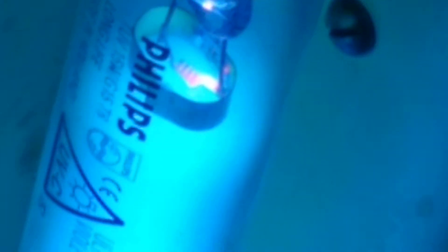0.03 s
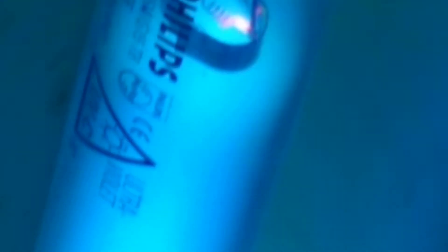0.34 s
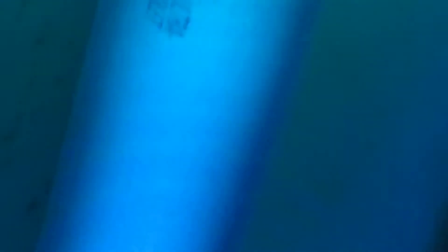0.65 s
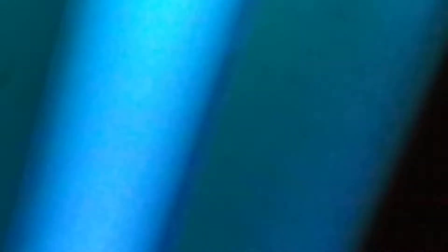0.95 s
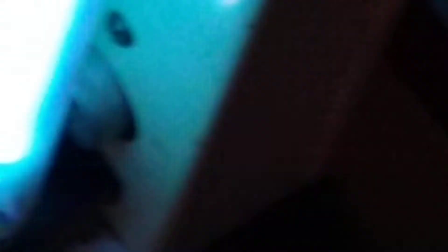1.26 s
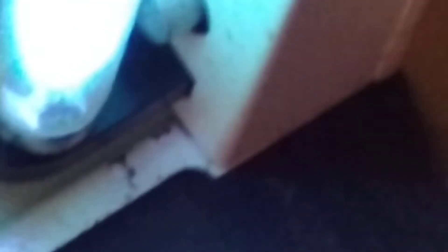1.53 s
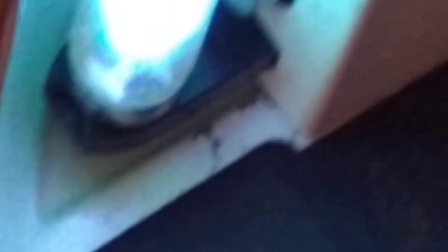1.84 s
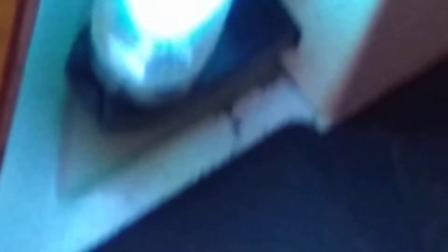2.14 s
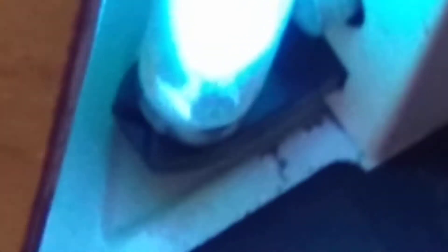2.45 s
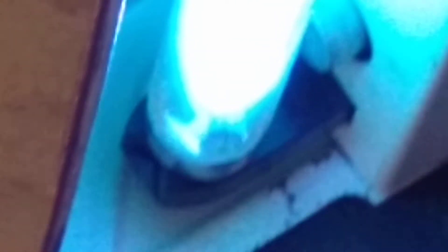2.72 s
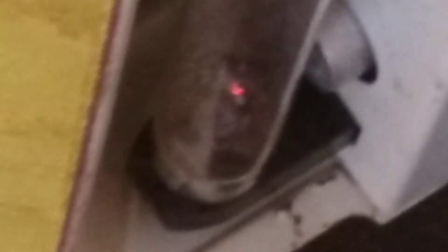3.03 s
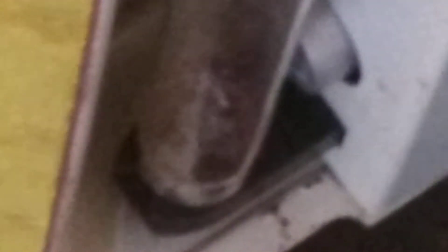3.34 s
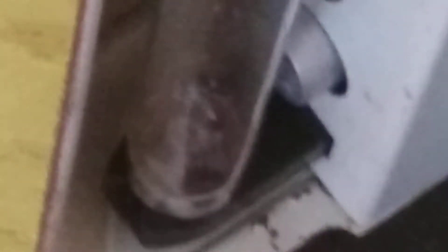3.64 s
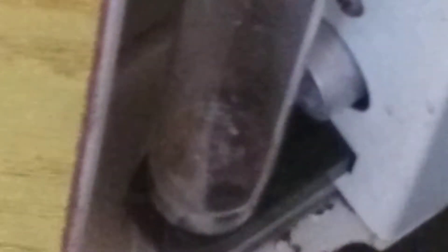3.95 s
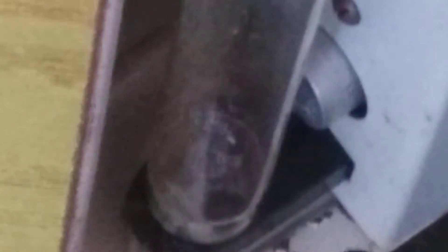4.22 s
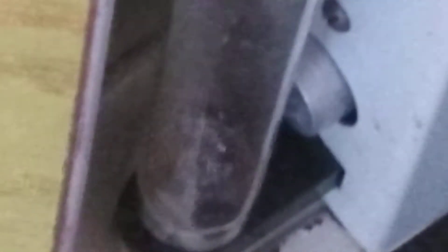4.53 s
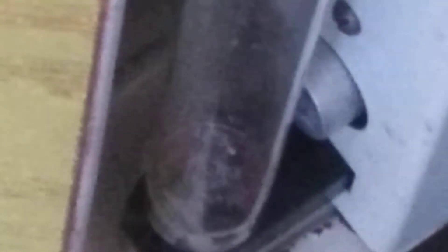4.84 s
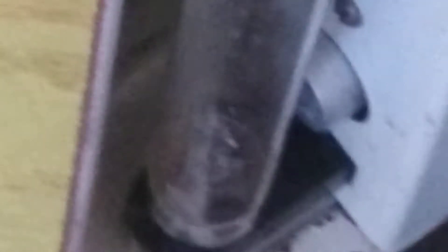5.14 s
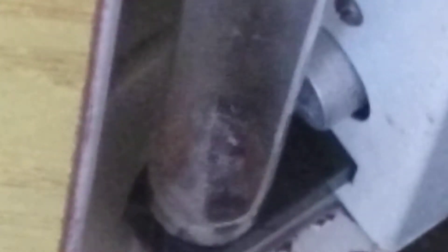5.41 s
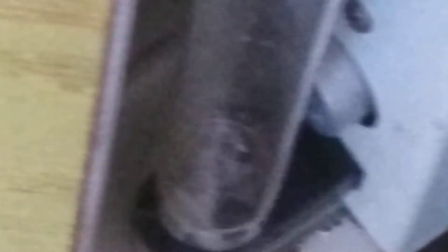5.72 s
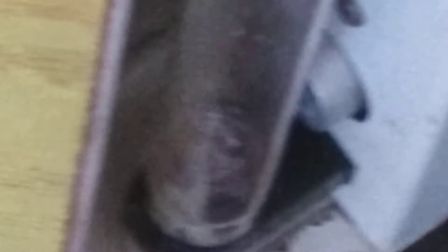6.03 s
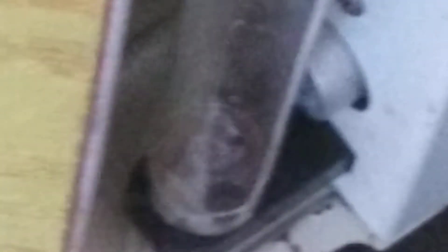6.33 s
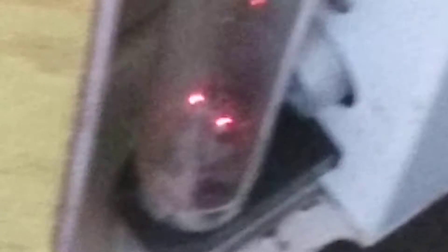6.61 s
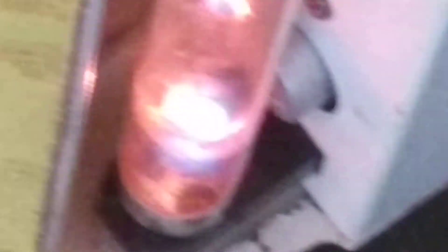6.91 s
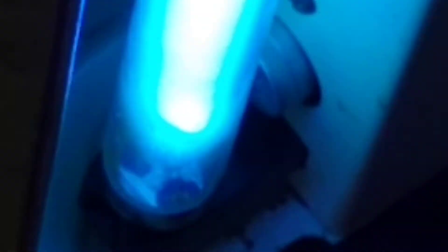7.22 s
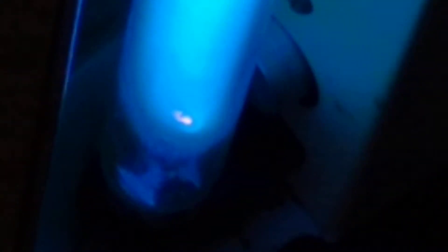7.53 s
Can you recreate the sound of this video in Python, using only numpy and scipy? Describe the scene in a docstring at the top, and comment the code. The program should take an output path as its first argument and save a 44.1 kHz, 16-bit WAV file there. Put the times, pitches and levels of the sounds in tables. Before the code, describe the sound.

In a small, quiet room a distant motor hums faintly while a hand rustles and ticks on the microphone's casing. A wall switch snaps off with a sharp, briefly ringing click. A few seconds later it clicks on again. After about a second the fluorescent tube starts with a faint, brief buzz and a low hum.

```python
"""Small, quiet room: a wall switch turns a fluorescent fitting off and, a few seconds later, on again.
A motor hums far off; the hand-held recorder rustles and ticks as the grip shifts on its casing.
Each throw is a quick rattle of contacts that rings the rocker and its wall box; the room scatters it
briefly. About a second after the second throw the ballast hums and the starter buzzes as the tube starts."""
import sys
import numpy as np
from scipy import signal
from scipy.fft import rfft, irfft, next_fast_len
from scipy.io import wavfile

SR = 44100
rng = np.random.default_rng(int(sys.argv[2]) if len(sys.argv) > 2 else 0)


def unload_audio(sound):
    """Save the sound as a 16-bit wav file, at the path given as the first command line argument."""
    columns = np.transpose(np.atleast_2d(sound))
    # keep every value between -1 and 1, then stretch to whole-number steps
    steps = np.round(np.clip(columns, -1, 1) * 32767)
    wavfile.write(sys.argv[1], SR, steps.astype(np.int16))


N = 333748
TIME = np.arange(N) / SR
SIDES = np.array([[.5], [-.5]])   # splits a left-minus-right value between the two microphone ports
CUTOFF_HZ = 15700


def from_db(db):
    """Decibels to gain."""
    return 10 ** (np.asarray(db) / 20)


def at_hz(points, hz, column=1):
    """One table column, interpolated over log frequency."""
    table = np.array(points)
    return np.interp(np.log(np.maximum(hz, 1)), np.log(table[:, 0]), table[:, column])


def decay(t, t60_s):
    """Envelope falling 60 dB in t60_s."""
    return np.exp(-np.log(1000) * t / t60_s)


def add(out, start_s, sound):
    """Mix a sound in from start_s."""
    start = round(start_s * SR)
    out[..., start:start + sound.shape[-1]] += sound[..., :N - start]


def drift(rate_hz):
    """Random wander, spread about 1."""
    knots = rng.standard_normal(int(N / SR * rate_hz) + 2)
    return np.interp(TIME * rate_hz, np.arange(len(knots)), knots)


def hum(tones, wander_rad):
    """Steady tones wandering slightly in phase."""
    return sum(np.sqrt(2) * from_db(db) * np.sin(2 * np.pi * hz * TIME + wander_rad * drift(2.3))
               for hz, db in tones)


def diffuse_noise(spectrum, size=N):
    """Shaped noise at both ports: partly alike in bass and mids, unrelated in the treble."""
    # freq_hz, correlation
    port_likeness = [(50, 0.36), (150, 0.9), (400, 0.31), (700, 0.32), (1200, 0.82), (2000, 0.08),
                     (4000, -0.06)]
    padded = next_fast_len(size)
    hz = np.fft.rfftfreq(padded, 1 / SR)
    mid, side = rfft(rng.standard_normal((2, padded))) * np.sqrt(SR) / 2
    alike = at_hz(port_likeness, hz)
    ports = np.sqrt(1 + alike) * mid + np.sqrt(1 - alike) * side * [[1], [-1]]
    return irfft(ports * from_db(at_hz(spectrum, hz)), padded)[:, :size]


def room_air(pan_db=1.8):
    """The room's own air: faint, low, diffuse noise."""
    # freq_hz, density_db
    air_spectrum = [(20, -124), (35, -109), (55, -91.5), (100, -91), (170, -99), (240, -96), (320, -99),
                    (500, -98), (850, -105), (1400, -106), (2000, -110.5), (2800, -110.5), (4000, -120),
                    (6500, -130), (15000, -138)]
    return diffuse_noise(air_spectrum) * from_db(pan_db * SIDES)


def far_motor():
    """A distant motor hums on two tones."""
    # freq_hz, level_db
    motor_tones = [(119.5, -71.5), (576, -83.5)]
    return hum(motor_tones, wander_rad=0.16)


def hand_rubs(rest_db=-26.5, fidget_db=1.5, fidget_hz=4.3, rise_share=0.46, grain_db=1.0, pan_db=3.5):
    """Skin slides on the casing in short, grainy swells, some with a dull shuffle."""
    # grip shifts: peak_s, length_s, level_db, dull_share_db
    rubs = [(0.32, 0.19, -6.5, -17), (1.168, 0.057, -4.5, 2.5), (1.237, .055, 11, -12),
            (1.5, .13, -12, -23), (1.73, .15, -12, -1), (2.77, .2, -3.5, 0.5), (3.168, 0.19, -12.5, 7.5),
            (4.18, .1, -10, -3), (5.502, 0.058, -6, -10), (6.26, 0.097, -2.5, -12)]
    # freq_hz, density_db
    slide_spectrum = [(500, -118), (1700, -108), (2800, -99), (3600, -101), (4600, -109), (6000, -110),
                      (9000, -115), (15000, -118)]
    # freq_hz, density_db
    shuffle_spectrum = [(60, -100), (170, -87), (420, -90), (900, -95.5), (1800, -104), (4000, -125)]
    bright = from_db(rest_db + fidget_db * drift(fidget_hz))   # the hand never quite rests
    dull = np.zeros(N)
    for peak_s, length_s, level_db, dull_share_db in rubs:
        width_s = length_s * np.where(TIME < peak_s, rise_share, 1 - rise_share)
        swell = from_db(level_db) * np.exp(-np.minimum(((TIME - peak_s) / width_s) ** 2, 20))
        bright += swell
        dull += swell * from_db(dull_share_db)
    slide = bright * from_db(grain_db * drift(210)) * diffuse_noise(slide_spectrum)
    return slide * from_db(pan_db * SIDES) + dull * diffuse_noise(shuffle_spectrum)


def casing_ticks(rebound_s=0.001079, grit_gain=0.53, grit_hz=9000, thump_hz=785, right_port_db=-24):
    """Plastic snaps twice by the left port: a very short ring, some grit and a low thump."""
    # start_s, level_db, pitch_hz, rebound_db, thump_db
    ticks = [(1.0271, -32, 5900, -17.5, -49.5), (1.2196, -20.5, 4070, -2, -27.5),
             (3.625, -57.5, 1700, -3, -55), (7.0932, -50, 8000, -15, -75)]
    # freq_hz, level_db, t60_s
    casing_modes = [(1270, 14, 0.017), (3250, -8, 0.013), (3990, -4, 0.0069), (4760, 0.5, 0.003),
                    (5590, -5.5, 0.0063), (6200, -2.5, 0.0063), (8200, -13.5, 0.0095)]
    focus_db = 22   # mode loss one octave from the tick's pitch
    out, t = np.zeros(N), TIME[:2000]
    lowpass = signal.butter(1, grit_hz, fs=SR, output="sos")
    thump = np.sin(2 * np.pi * thump_hz * t) * decay(t, t60_s=0.014)
    for start_s, level_db, pitch_hz, rebound_db, thump_db in ticks:
        add(out, start_s, from_db(thump_db) * thump)
        for delay_s, snap_db in ((0, 0), (rebound_s, rebound_db)):
            grit = signal.sosfilt(lowpass, rng.standard_normal(len(t)))
            snap = grit_gain * grit * decay(t, t60_s=0.0057)
            for hz, mode_db, t60_s in casing_modes:
                strength = from_db(mode_db - focus_db * np.log2(hz / pitch_hz) ** 2)
                snap += strength * np.sin(2 * np.pi * hz * t) * decay(t, t60_s)
            add(out, start_s + delay_s, from_db(level_db + snap_db) * snap)
    return out * from_db([[0], [right_port_db]])


def contact_crack(t, colour, rise_s=0.00052):
    """A contact's snap arrives as dense early reflections, then the room's tail; the bass lasts longest."""
    # wall-scattered crack: freq_hz, density_db
    crack_spectrum = [(40, -78.5), (120, -73), (220, -85.5), (360, -73), (560, -58), (800, -59.5),
                      (1050, -55), (1600, -59.5), (2600, -59), (3800, -61.5), (6200, -69), (11000, -70.5),
                      (14500, -69), (16000, -72.5)]
    # freq_hz, left_minus_right_db
    crack_balance = [(250, 1.5), (600, -3.5), (1000, 1.5), (1500, 5), (2400, 4), (4200, 3), (9000, 6.5),
                     (12000, -0.5), (14500, -8)]
    # freq_hz, early_t60_s, tail_t60_s, tail_db
    room_decay = [(120, .12, .4, -12), (500, .07, .2, -9), (1100, .06, .17, -10), (3000, .055, .155, -10),
                  (6000, .05, .17, -16), (14000, .05, .17, -20)]
    hz = np.fft.rfftfreq(len(t), 1 / SR)
    spectrum = rfft(diffuse_noise(crack_spectrum, size=len(t)))
    spectrum *= from_db(at_hz(colour, hz) + at_hz(crack_balance, hz) * SIDES)
    centres_hz = np.geomspace(120, 14000, 10)
    out = np.zeros((2, len(t)))
    for centre_hz, band_weights in zip(centres_hz, np.eye(len(centres_hz))):
        band = irfft(spectrum * at_hz(np.c_[centres_hz, band_weights], hz), len(t))
        early_t60_s, tail_t60_s, tail_db = (at_hz(room_decay, centre_hz, column) for column in (1, 2, 3))
        out += band * np.hypot(decay(t, early_t60_s), from_db(tail_db) * decay(t, tail_t60_s))
    return out * (1 - np.exp(-t / rise_s))


def switch_ring(t, place, scatter_db=1.57, one_radian_hz=1700, rise_s=0.0022):
    """Mode levels follow where the rocker lands; high modes reach the ports out of phase."""
    # rocker, plate and wall box: freq_hz, off_end_db, on_end_db, t60_s, left_minus_right_db
    switch_modes = [(316, -45.5, -52, 0.19, 1), (403, -50, -48, 0.31, -1.5), (538.6, -34.5, -38, 0.13, -6),
                    (645, -37, -37, 0.14, -6), (750, -34, -37, 0.13, -5), (817, -30, -42.5, .11, -2),
                    (877, -29, -38.5, .14, -1.5), (954, -35, -29, 0.16, -.5), (987, -15, -16.5, 0.06, -2),
                    (1010, -32, -38, .18, .5), (1110, -28, -37.5, 0.082, .5), (1218, -33, -24.5, .082, 3),
                    (1430, -39, -23, 0.046, 4.5), (1472, -31, -31.5, 0.089, 4),
                    (1536, -41, -26.5, 0.065, 6.5), (2447, -42, -36.5, 0.17, 1.5),
                    (2870, -23, -39.5, .105, 2), (2915, -26, -25.5, 0.094, 0), (3138, -37, -32, 0.052, 0.5),
                    (3370, -35, -35, 0.094, -2), (3400, -38, -44, 0.17, 0.5), (3775, -43, -34.5, 0.061, -2),
                    (4090, -26, -34, .075, 5), (5140, -34.5, -25, 0.064, -3.5), (5380, -43, -35, .07, -1),
                    (7580, -38, -32.5, 0.028, 0), (8350, -37, -43, 0.071, 2)]
    out = np.zeros((2, len(t)))
    for hz, off_db, on_db, t60_s, pan_db in switch_modes:
        scatter, skew = rng.standard_normal(2)
        level_db = off_db + place * (on_db - off_db) + scatter_db * scatter
        apart_rad = np.sign(skew) * min((hz / one_radian_hz) ** 2, np.pi / 2)
        tone = np.sin(2 * np.pi * hz * t + apart_rad * SIDES)
        out += from_db(level_db + pan_db * SIDES) * decay(t, t60_s) * tone
    return out * (1 - np.exp(-t / rise_s))


def wall_switch(ring_delay_s=0.002, ring_db=-1):
    """The rocker touches, slams home and bounces twice; the wall box takes the blow and rings."""
    # off, on, finger letting go: start_s, level_db, contact_gap_s, place (0 off end, 1 on end)
    throws = [(2.934, 4.5, .0032, 0.062), (5.519, 3.5, 0.0026, .95), (5.691, -36.5, 0.0076, 0.76)]
    contacts_db = (-5, 0, -4, -8)
    dulling_per_octave = 0.043   # softer contacts are duller
    out, t = np.zeros((2, N)), TIME[:12000]
    # the plastic's many small resonances colour every contact's treble alike
    hz = np.linspace(1500, CUTOFF_HZ, 130)
    ripple_db = 4.5 * np.r_[0, rng.uniform(-1, 1, len(hz) - 1)]
    for start_s, level_db, gap_s, place in throws:
        tilt_db = dulling_per_octave * min(level_db, 0) * np.log2(hz / hz[0])
        colour = np.c_[hz, ripple_db + tilt_db]
        for k, contact_db in enumerate(contacts_db):
            add(out, start_s + k * gap_s, from_db(level_db + contact_db) * contact_crack(t, colour))
        add(out, start_s + ring_delay_s, from_db(level_db + ring_db) * switch_ring(t, place))
    return out


def fluorescent_fitting(start_s=6.68, strike_s=6.87, fade_s=0.037, lit_buzz_db=-14):
    """The ballast hums once current flows; a thin buzz is strongest while the starter heats the tube."""
    # freq_hz, level_db
    ballast_tones = [(100, -75.5), (200, -87), (900, -86)]
    # freq_hz, density_db
    buzz_spectrum = [(2200, -130), (2550, -103), (2680, -100.5), (2850, -105), (3400, -130)]
    live = np.clip((TIME - start_s) / fade_s, 0, 1)
    heating = np.clip((strike_s - TIME) / fade_s, 0, 1)
    buzz = np.maximum(heating, from_db(lit_buzz_db)) * diffuse_noise(buzz_spectrum)
    return live * (hum(ballast_tones, wander_rad=0.22) + buzz)


def scene():
    """All sources at the two microphone ports."""
    return room_air() + far_motor() + wall_switch() + casing_ticks() + hand_rubs() + fluorescent_fitting()


def record(dry):
    """The recorder subtracts each port, delayed, from the other for width, adds hiss and cuts the top."""
    lag_s, cross_gain, hiss_db = 0.000455, 0.48, -85
    crossed = np.pad(dry[::-1], ((0, 0), (round(lag_s * SR), 0)))[:, :N]
    hiss = from_db(hiss_db) * rng.standard_normal((2, N))
    lowpass = signal.ellip(10, .1, 80, CUTOFF_HZ, fs=SR, output="sos")
    return signal.sosfilt(lowpass, dry - cross_gain * crossed + hiss)


dry = scene()
out = record(dry)
unload_audio(out)
```